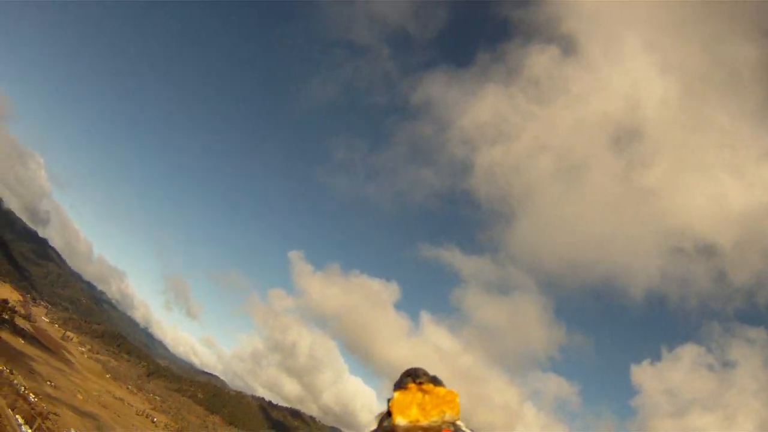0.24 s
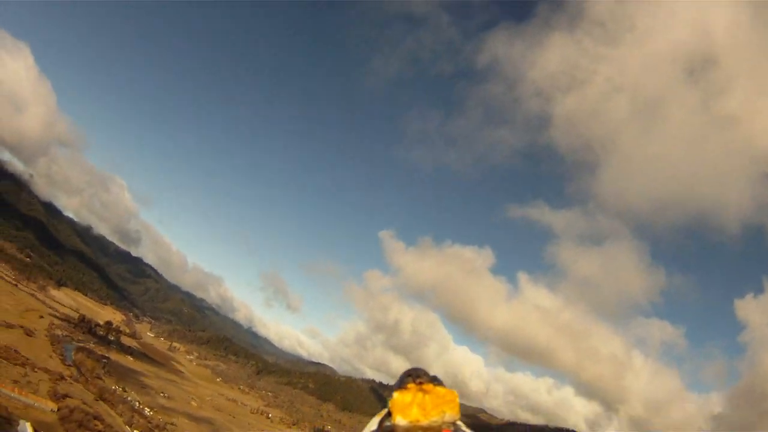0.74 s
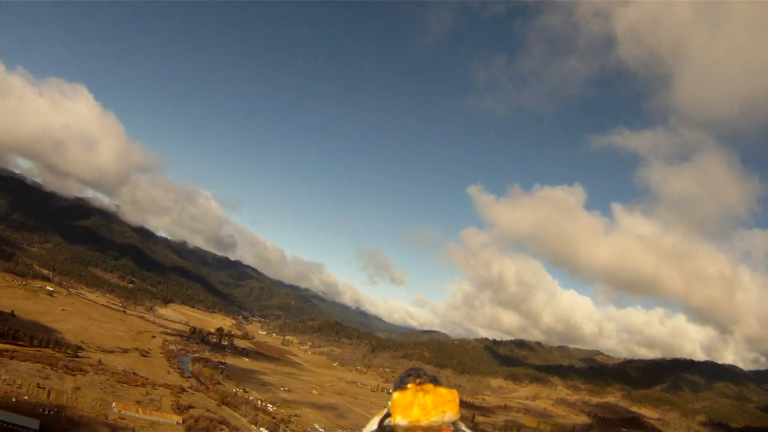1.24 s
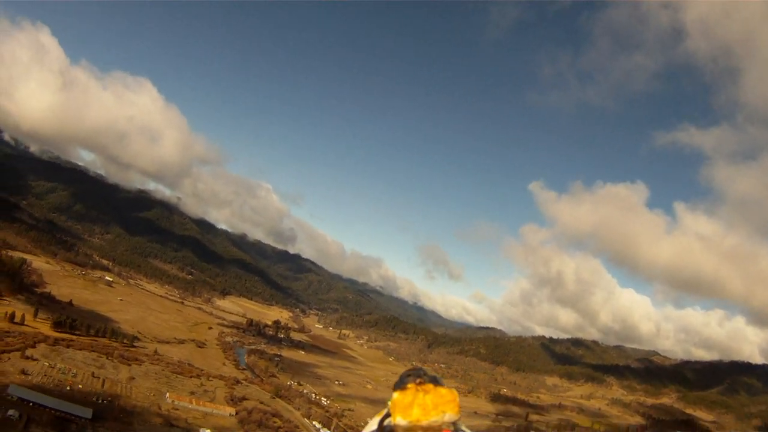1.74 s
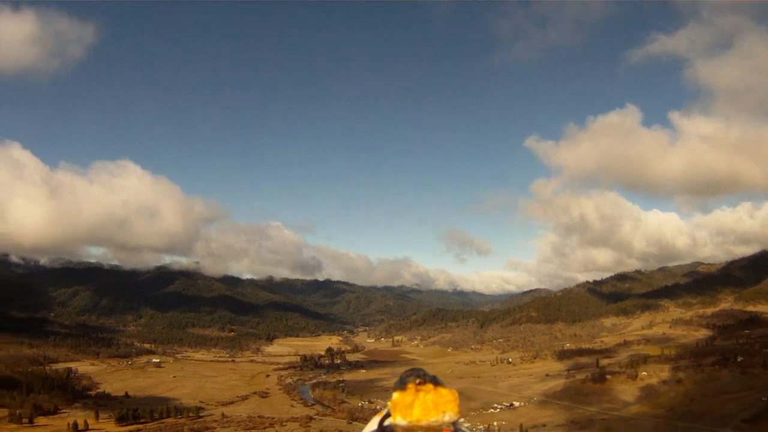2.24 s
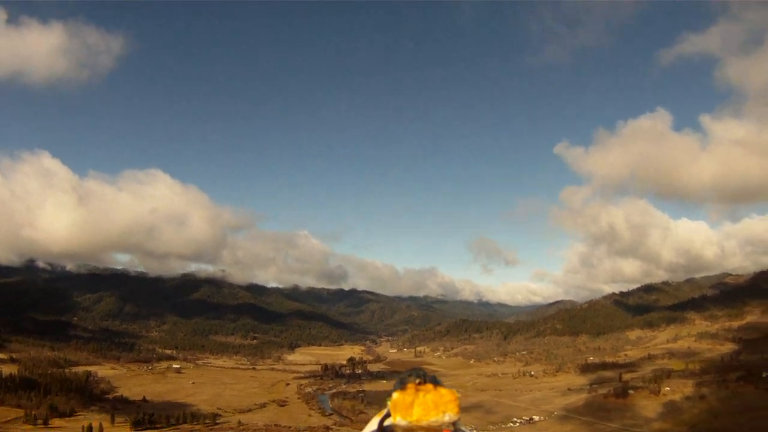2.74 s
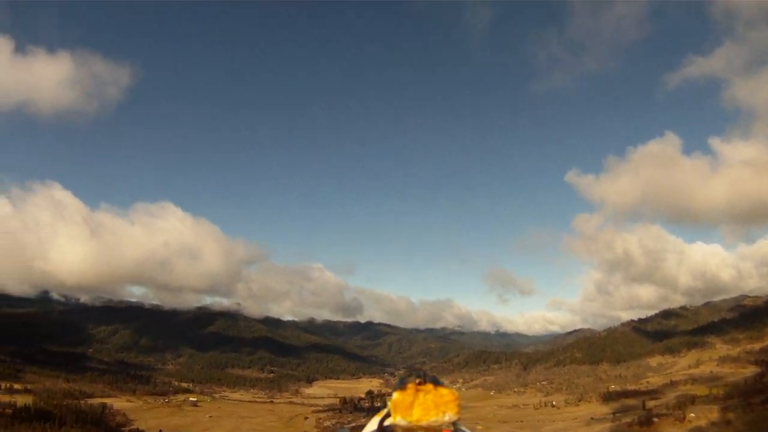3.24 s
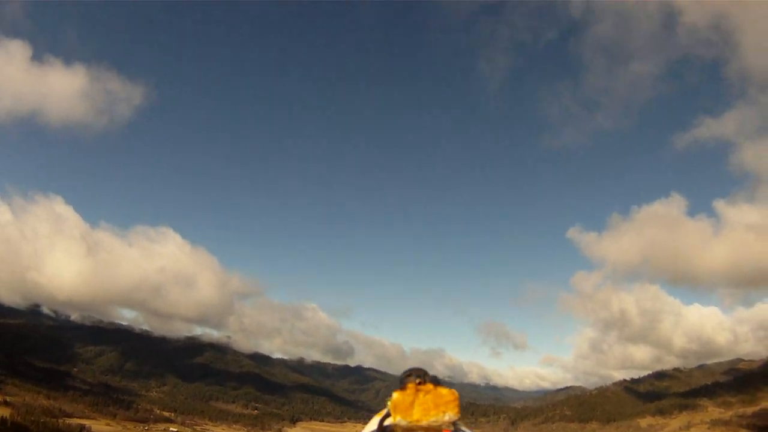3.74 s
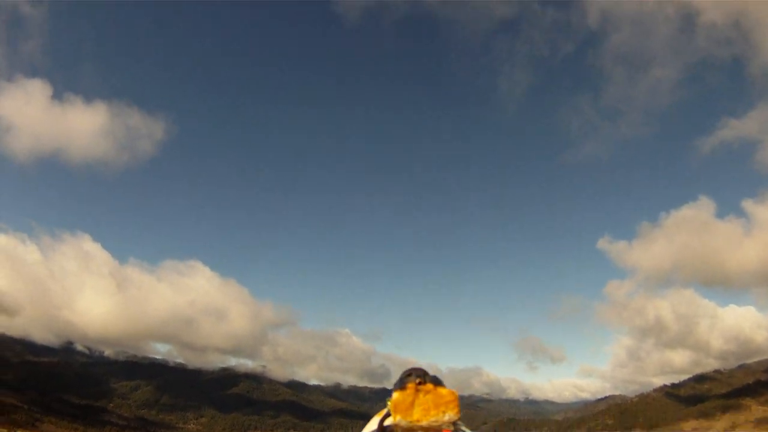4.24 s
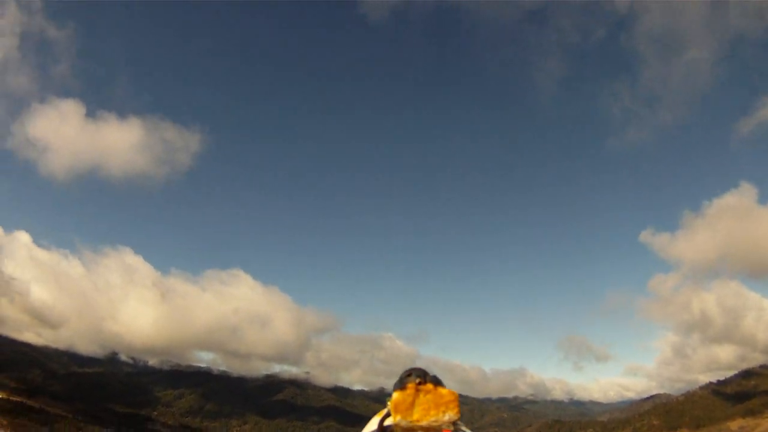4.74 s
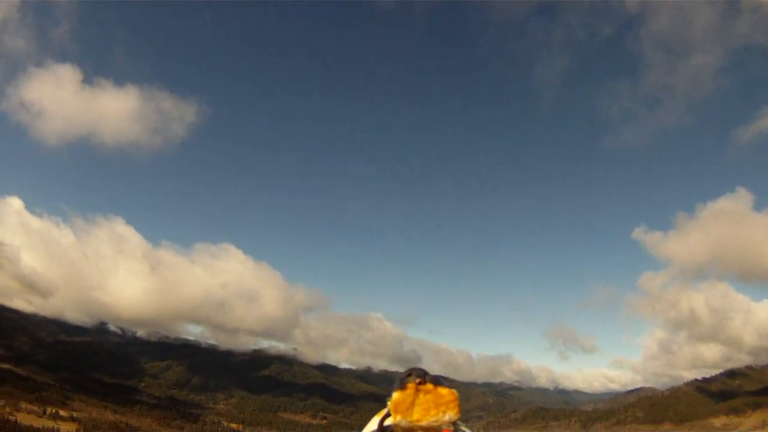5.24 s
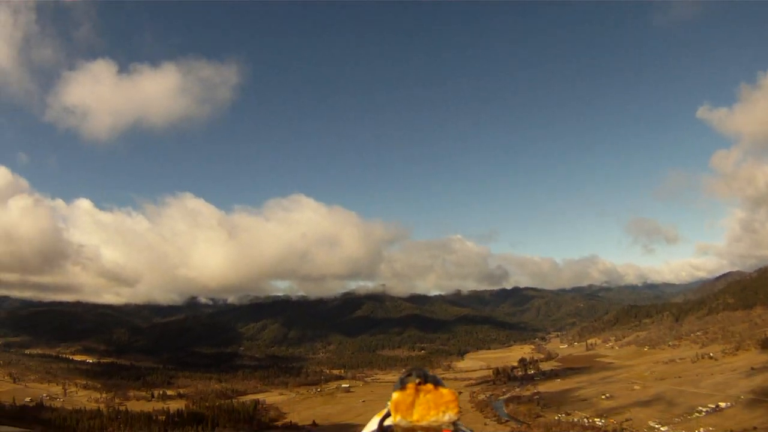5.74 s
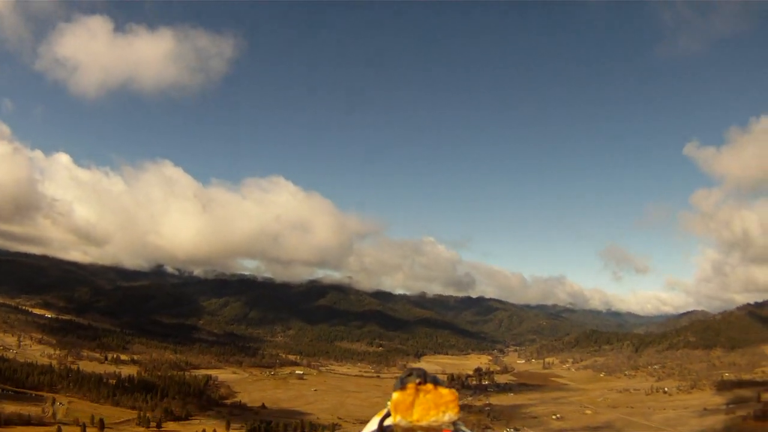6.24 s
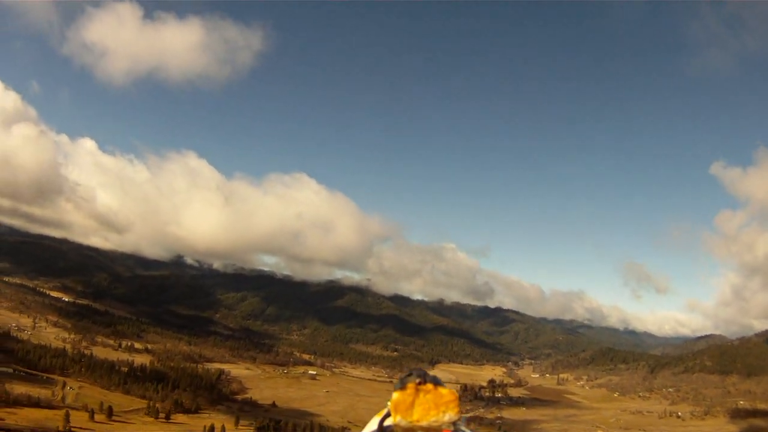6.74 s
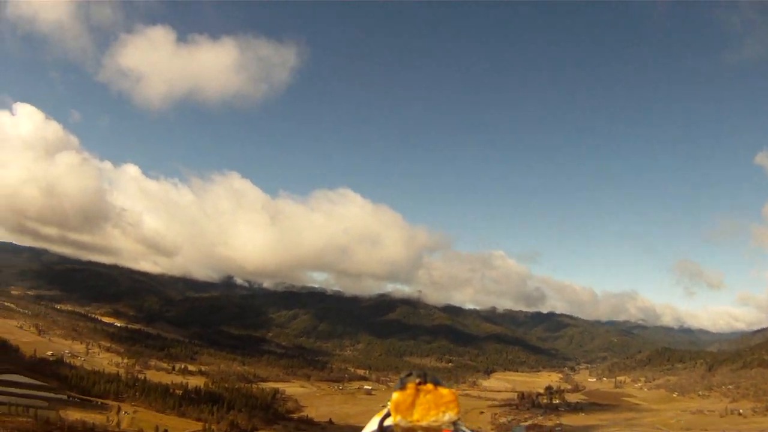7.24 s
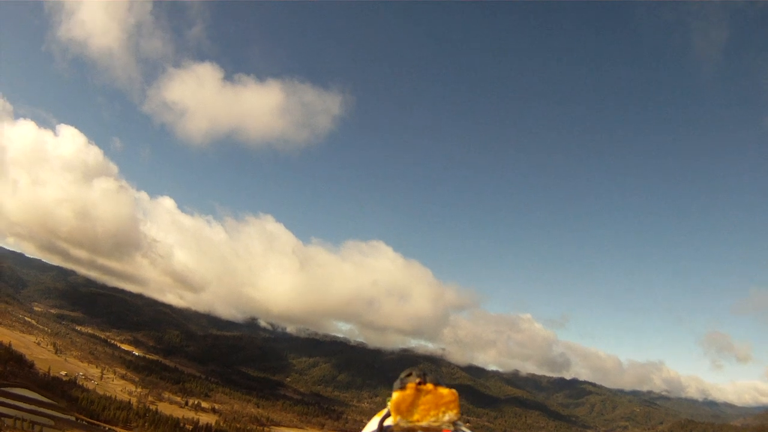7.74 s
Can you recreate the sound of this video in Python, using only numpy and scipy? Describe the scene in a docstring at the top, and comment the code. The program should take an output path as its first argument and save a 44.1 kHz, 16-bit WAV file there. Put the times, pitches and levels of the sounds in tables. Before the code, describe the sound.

Heard close up from on board, a small electric model plane flies with a buzzing propeller whine and a constant rush of wind. The whine starts high and nearly even, quickly sinks in pitch as the motor slows, and carries on lower to the end. Low wind rumble swells in a few brief gusts and grows slightly stronger after the drop. The sound is mono, with a gritty upper edge.

```python
"""The whine of a small electric model plane in open air, heard from a camera riding on its back.
The propeller sings a stack of blade-rate harmonics, shaken by buffeting; it drops in pitch when the
throttle eases near 3.5 s. Wind rumbles on the case and rushes over the ringing airframe, and faint
tones waver beside the whine. The camera samples its microphone at only 12 kHz and holds each sample,
which mirrors the whine into a thin, gritty treble."""
import sys
import numpy as np
from scipy import signal
from scipy.fft import rfft, irfft
from scipy.io import wavfile

SR = 44100
rng = np.random.default_rng(int(sys.argv[2]) if len(sys.argv) > 2 else 0)


def store_wav(level_fs):
    """Save 16-bit WAV to argv[1]."""
    pcm = np.round(np.clip(np.atleast_2d(level_fs), -1, 1) * 32767)
    wavfile.write(sys.argv[1], SR, pcm.T.astype(np.int16))


N = 351918
TIME = np.arange(N) / SR
FREQ = np.maximum(np.arange(N // 2 + 1) * SR / N, 1)


def propeller(blade_hz, throttle, wander_hz=0.148, flicker_db=0.28, drift_db=0.36):
    """Blade harmonics follow throttle and load; turbulence nudges the speed and shakes the airframe."""
    # Blade harmonics at the source: multiple, high_throttle_db, cruise_db, db_per_load
    harmonics = [(1, -13.5, -14.5, -.7), (2, -25, -21, 1.7), (3, -21.5, -26, 1.6), (4, -25, -27, 4),
                 (5, -30.5, -48, -5), (6, -22, -25.5, 0), (7, -44, -52, 3), (8, -29, -28.5, -2),
                 (9, -48, -52, 7), (10, -31, -41, -1.5), (11, -29.5, -35, 0.5), (12, -32, -48, -1),
                 (13, -43.5, -54, 0), (14, -44.5, -43, -3), (15, -46.5, -57, -1), (16, -54, -54, 1),
                 (17, -50, -63, -3), (18, -55, -49, -2)]
    # Peaks and notches on the way from propeller to microphone: centre_hz, half_width_hz, lift_db
    path = [(290, 12.4, -2.5), (830, 23, 3.5), (896, 22, -13.5), (1150, 30, 5), (1210, 19, -13),
            (1682, 48, 6), (2235, 45, 3), (2345, 70, -7.5), (2850, 36, 6), (3247, 102, 6), (3660, 50, 3)]
    # Manoeuvres that load or unload the blades: centre_s, half_length_s, extra_load
    manoeuvres = [(2.327, 0.21, 1), (2.8, .13, -0.68), (3.144, 0.19, 0.95), (4.95, 0.31, -0.57),
                  (5.97, .25, -0.72), (7.2, 0.43, 0.15)]
    buffet_hz, buffet_width_hz, buffet_depth, buffet_swing_rad = 72, 40, 0.033, 0.012
    phase = 2 * np.pi * np.cumsum(blade_hz + wander_hz * narrow(0, 31)) / SR
    phase += buffet_swing_rad * narrow(buffet_hz, buffet_width_hz)
    load = sum(extra * bell(TIME, centre_s, half_s) for centre_s, half_s, extra in manoeuvres)
    tilt_db_per_octave = -0.56 * bell(TIME, 0, half_width=1.5)  # the opening banked turn dulls the whine
    whine = 0
    for multiple, high_db, cruise_db, db_per_load in harmonics:
        level_db = cruise_db + throttle * (high_db - cruise_db)
        level_db += load * db_per_load + tilt_db_per_octave * np.log2(multiple)
        level_db += sum(lift * bell(multiple * blade_hz, hz, width) for hz, width, lift in path)
        # Uneven inflow disturbs the upper harmonics most, both quickly and slowly.
        level_db += np.log(multiple) * (flicker_db * narrow(0, 17) + drift_db * narrow(0, 2.4))
        # Each harmonic takes its own path through the airframe, which smears the blade pulses.
        lag = 2 * np.pi * rng.random()
        whine += np.sqrt(2) * undb(level_db) * np.cos(multiple * phase - lag)
    return whine * (1 + buffet_depth * narrow(buffet_hz, buffet_width_hz))


def airflow(throttle, rumble_top_hz=130, rumble_trim_db=-4.0):
    """Wind rumbles on the case and rushes over the airframe, whose panels colour it; gusts swell both."""
    # Base spectral density of the moving air: frequency_hz, high_throttle_db, cruise_db
    air = [(20.1, -88, -82), (45, -58, -54.5), (78.5, -54, -48), (128, -66, -64.5), (300, -66.5, -64),
           (614, -65.5, -61.5), (1110, -60, -56.5), (1380, -65.5, -62.5), (1660, -62.5, -54.5),
           (2470, -65.5, -64.5), (3905, -66, -64), (4170, -73, -75), (5440, -71.5, -69),
           (5980, -89.5, -85.5)]
    # Airframe resonances: centre_hz, width_hz, high_throttle_lift_db, cruise_lift_db
    airframe = [(458, 14, 3.5, 11), (776, 47, 6.5, -4.5), (1155, 260, 4, 4), (1652, 130, 10, 3.5),
                (1957, 170, 7.5, -0.5), (2230, 340, 2.5, 6), (3130, 200, 1, -1), (4800, 160, 2, 5.5)]
    # Gusts and lulls: centre_s, half_length_s, rumble_lift_db, rush_lift_db
    gusts = [(.68, .06, 5, 0), (2.356, .05, 5, 2), (2.85, 0.09, 5, 2.5), (3.5, 0.1, -6, -0.5),
             (3.826, 0.098, 2, 2), (4.498, .2, 2, 0), (6.12, .2, -1, 0.5)]
    air_hz, *spectra_db = np.transpose(air)
    low_share = 1 / (1 + (FREQ / rumble_top_hz) ** 8)
    rumble = rush = 0
    for setting, share in enumerate([throttle, 1 - throttle]):  # crossfade high throttle and cruise
        density_db = np.interp(np.log(FREQ), np.log(air_hz), spectra_db[setting])
        for centre_hz, width_hz, *lift_db in airframe:
            density_db += lift_db[setting] / (1 + (2 * (FREQ - centre_hz) / width_hz) ** 2)
        gain = undb(density_db) * np.sqrt(SR / 2)
        rumble += np.sqrt(share) * noise(gain * np.sqrt(low_share))
        rush += np.sqrt(share) * noise(gain * np.sqrt(1 - low_share))
    rumble_swell_db = 0.5 * narrow(0, 8)
    rush_swell_db = 0.6 * narrow(0, 25)
    for centre_s, half_s, rumble_lift_db, rush_lift_db in gusts:
        gust = bell(TIME, centre_s, half_s)
        rumble_swell_db += rumble_lift_db * gust
        rush_swell_db += rush_lift_db * gust
    return rumble * undb(rumble_trim_db + rumble_swell_db) + rush * undb(rush_swell_db)


def side_tones(fade_s=0.1, flutter_db=2):
    """Thin tones come and go beside the propeller's, unsteady in pitch and level."""
    # Wavering tones: start_s, end_s, pitch_hz, waver_hz, level_db
    tones = [(0, 3.42, 1639, 5.9, -31), (0, 3.42, 1600, 3.7, -32), (0, 3.42, 1055, 2.5, -37),
             (0, 3.42, 1212, 2.7, -39), (0, 3.42, 1366, 2, -49), (3.8, 5.5, 1035, 2.1, -32.5),
             (5.65, 7.7, 1025, 3.9, -37), (3.75, 8.8, 1182, 1.8, -35), (3.75, 6.1, 840, 5, -45),
             (5.85, 6.3, 851, 4.7, -36.5), (5.85, 6.7, 1718, 6, -30.5), (6.7, 8, 780, 4.8, -38)]
    sound = 0
    for start_s, end_s, pitch_hz, waver_hz, level_db in tones:
        gate = np.clip(np.minimum(TIME - start_s, end_s - TIME) / fade_s + 0.5, 0, 1)
        phase = 2 * np.pi * np.cumsum(pitch_hz + waver_hz * narrow(0, 13.96)) / SR
        amplitude = np.sqrt(2) * undb(level_db + flutter_db * narrow(0, 19))
        sound += gate * amplitude * np.sin(phase)
    return sound


def undb(db):
    """Decibels to gain."""
    return 10 ** (np.asarray(db) / 20)


def noise(gain):
    """White noise of unit power shaped by a gain for each frequency."""
    return irfft(rfft(rng.standard_normal(N)) * gain, N)


def narrow(hz, width_hz):
    """Noise of rms 1 in a bell-shaped band; around 0 Hz it is a slow random wander."""
    band = noise(np.exp(-2 * ((FREQ - hz) / width_hz) ** 2))
    return band / band.std()


def bell(x, centre, half_width):
    """A smooth bump of height 1."""
    return np.exp(-((x - centre) / half_width) ** 2)


def scene(cruise_hz=268, high_hz=312):
    """Propeller, airflow and side tones, close up and in mono on the plane's back."""
    # Propeller speed through the flight: time_s, blade_rate_hz
    speed = [(0.0, 311.8), (0.9, 312.2), (1.85, 311.4), (2.4, 312.4), (2.83, 310.3), (3.2, 312.4),
             (3.395, 311.6), (3.46, 299.7), (3.52, 292.2), (3.6, 288.5), (3.76, 266.7), (3.92, 268.5),
             (5.05, 267.8), (5.5, 268.9), (5.75, 268.2), (5.9, 266.7), (6.3, 266.9), (6.8, 269.0),
             (7.98, 268.9)]
    blade_hz = np.interp(TIME, *np.transpose(speed))
    throttle = np.clip((blade_hz - cruise_hz) / (high_hz - cruise_hz), 0, 1)  # 0 cruise, 1 high
    return (propeller(blade_hz, throttle) + airflow(throttle) + side_tones())[None]


def record(dry):
    """The microphone rounds the tallest peaks; held samples mirror each tone around the camera's rate."""
    mic_limit, camera_rate_hz, hold_count, top_hz = 0.88, 12000, 4, 15300
    rounded = dry / (1 + (dry / mic_limit) ** 10) ** 0.1
    sampled = signal.resample(rounded, round(N * camera_rate_hz / SR), axis=1)
    held = np.repeat(sampled, hold_count, axis=1)
    gritty = signal.resample(held, N, axis=1)
    top_cut = signal.ellip(10, 0.1, 80, top_hz, fs=SR, output="sos")
    return signal.sosfilt(top_cut, gritty)


dry = scene()
out = record(dry)
store_wav(out)
```